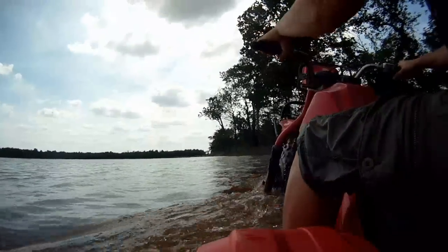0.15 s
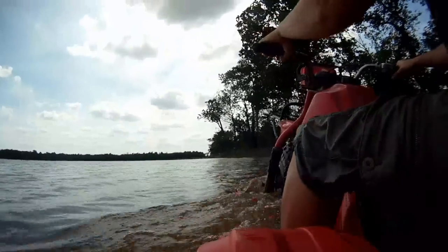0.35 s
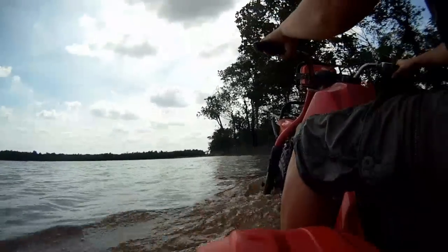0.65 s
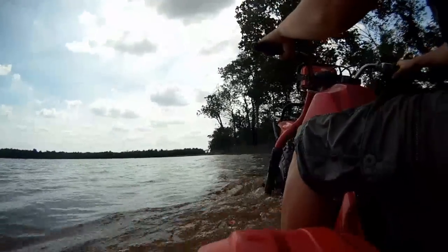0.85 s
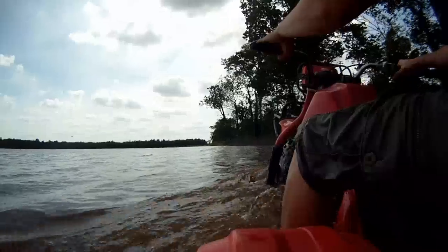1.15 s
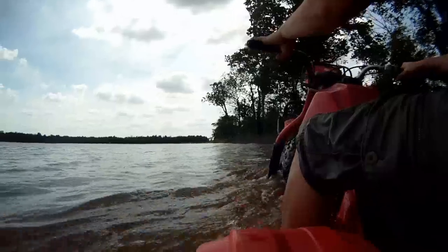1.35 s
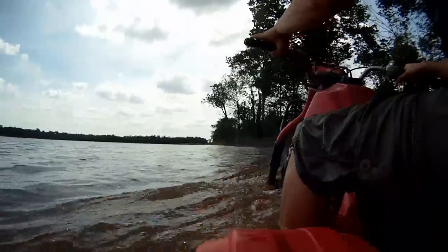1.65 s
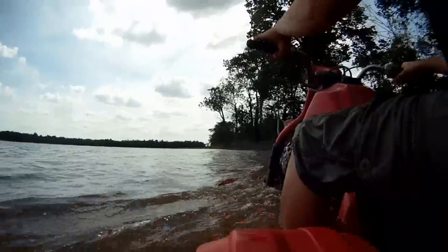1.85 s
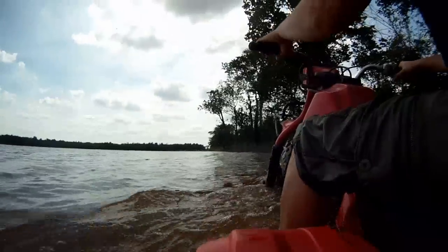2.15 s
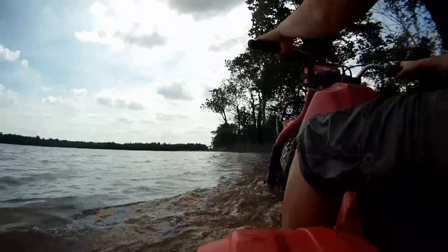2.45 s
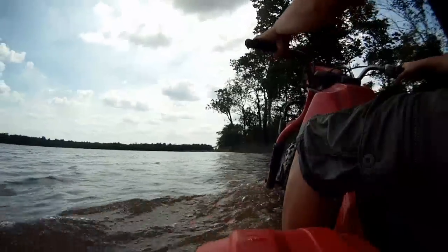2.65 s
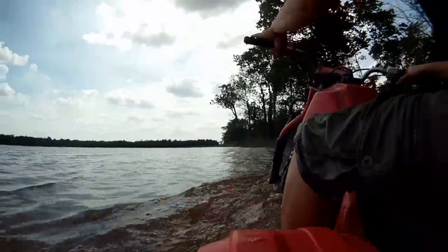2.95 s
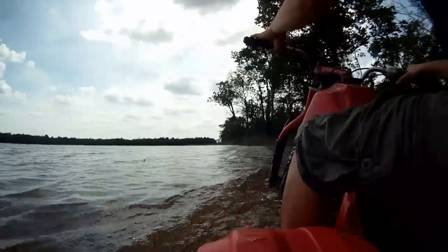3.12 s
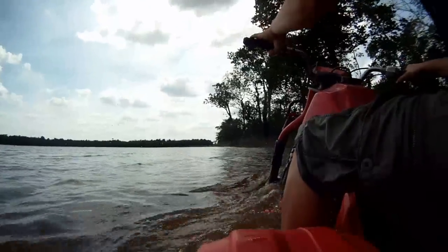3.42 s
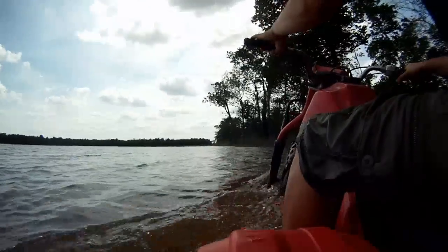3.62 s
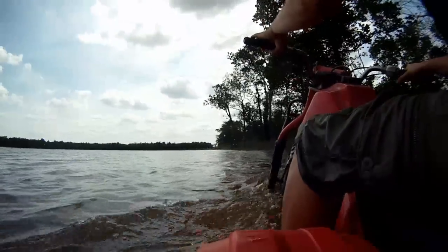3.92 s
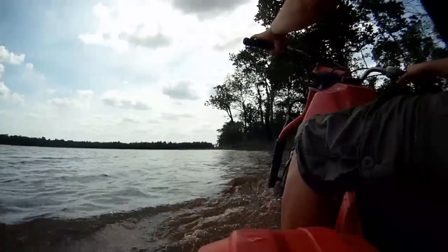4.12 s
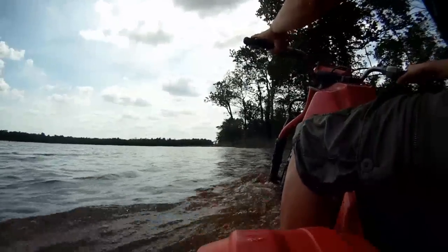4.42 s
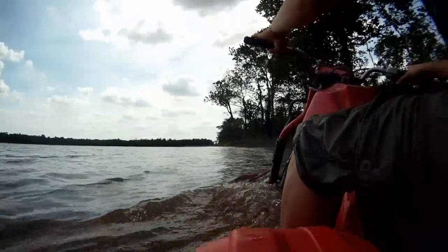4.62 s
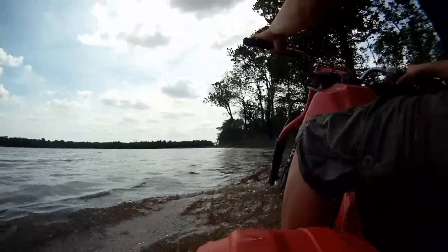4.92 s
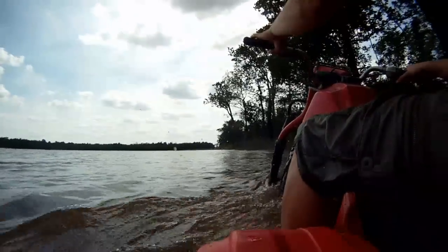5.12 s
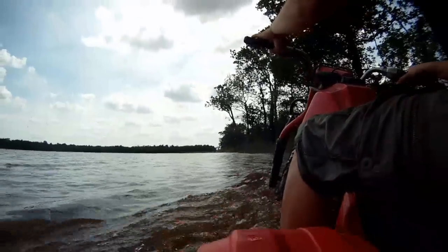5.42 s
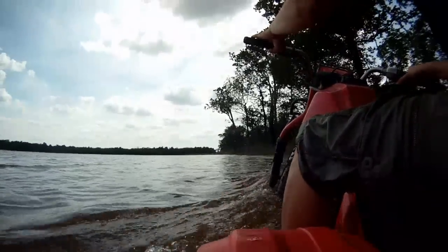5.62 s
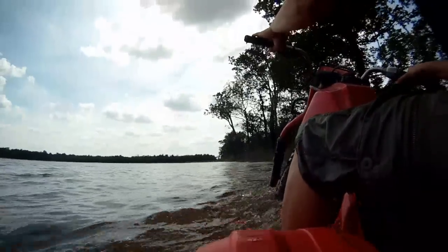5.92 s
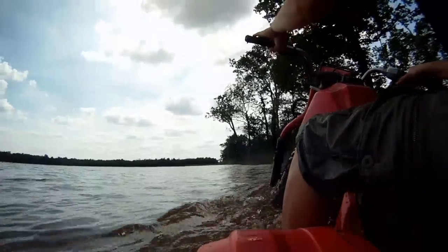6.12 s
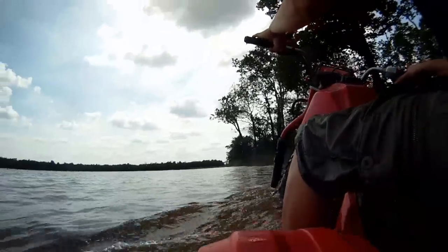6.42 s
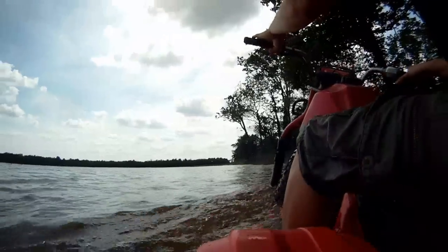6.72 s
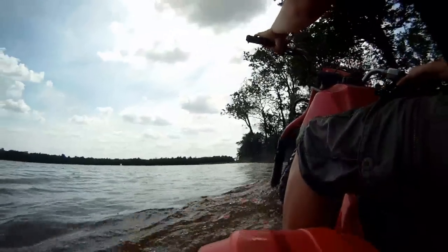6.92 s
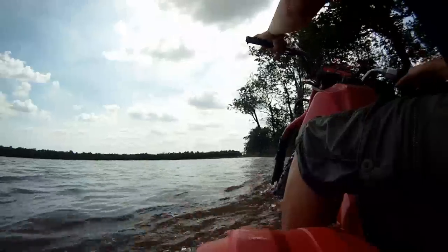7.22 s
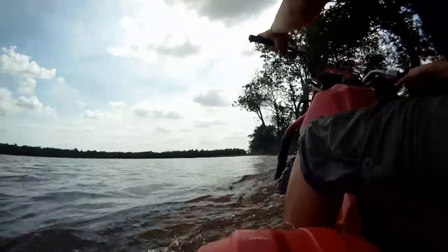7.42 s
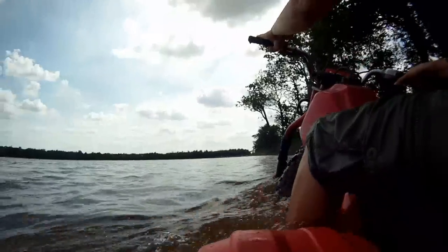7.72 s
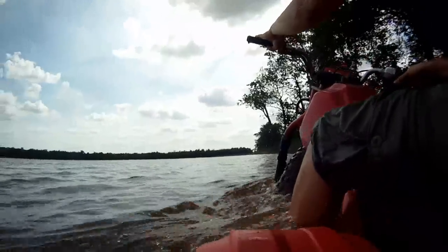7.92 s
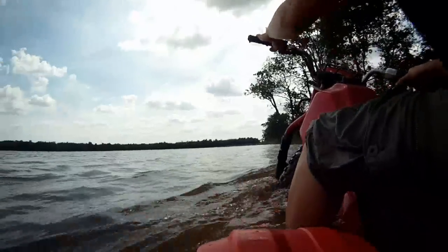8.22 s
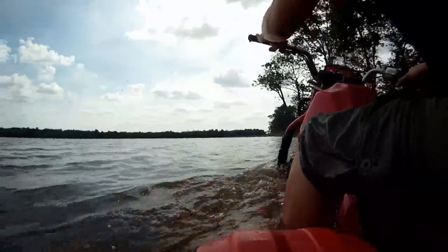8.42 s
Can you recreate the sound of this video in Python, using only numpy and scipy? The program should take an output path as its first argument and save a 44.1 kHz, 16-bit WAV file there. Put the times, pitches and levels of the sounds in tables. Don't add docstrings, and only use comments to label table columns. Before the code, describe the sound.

Close and boxy, a low motor throb runs throughout, pitch dipping slightly in jolts and sagging near the end. A nasal case rattle and thin gear singing swell as the engine pulls harder. Water rumbles and washes against the casing, with dull knocks around the middle and later, then a cluster of light drips. Outdoors on a lake, microphone sealed on the vehicle's frame.

```python
import sys
import numpy as np
from scipy import signal
from scipy.fft import rfft, irfft, next_fast_len
from scipy.io import wavfile
from scipy.ndimage import uniform_filter1d

SR = 44100
rng = np.random.default_rng(int(sys.argv[2]) if len(sys.argv) > 2 else 0)


def to_wav(sig):
    pcm = np.clip(np.atleast_2d(sig), -1, 1) * 32767
    pcm = np.round(pcm).astype(np.int16)
    wavfile.write(sys.argv[1], SR, pcm.T)


def rack_gain(trim_db):
    fader = np.asarray(trim_db, float)
    return 10 ** (fader / 20)


N = 377496

# [t/s, cycle rate f/Hz]
SPEED = [(0, 27.97), (.37, 29.06), (.6, 27.13), (1.98, 30.53), (2.45, 27.62), (2.72, 26.98), (3.09, 29.9),
         (3.37, 28.03), (3.62, 28.73), (5, 28.76), (5.5, 28.39), (5.8, 28.9), (6.27, 28.04), (6.52, 28.25),
         (7.3, 25.58), (7.65, 27.56), (8.36, 23.8), (8.56, 26.17)]
# [t/s, level/dB]
LOAD = [(0, 1), (.4, -3), (1.2, 0), (2.3, -1.5), (2.9, 0.5), (3.25, 9), (3.6, 2), (4.3, 7.5), (4.9, 1),
        (5.3, 5.5), (5.6, 0.5), (6.3, -1), (6.8, -1.5), (7.2, 4.5), (7.6, -3.5), (8, 2.5), (8.3, -0.5),
        (8.56, 2)]
# [multiple of the cycle, level/dB]
STEADY_ORDERS = [(3, -27.5), (6, -40.5), (7, -45), (9, -45), (10, -47), (11, -51), (13, -52)]
MOVING_ORDERS = (2, 4, 5, 8)
# [level/dB, share of load, resonance f/Hz, width/Hz, lift/dB, wander/dB,
# loss in a jolt/dB]
ORDER_MOTION = [
    (-21.5, 0.22, 55., 4., 1.6, 0.1, -2.5),
    (-23, -0.0024, 119.4, 5.3, 2.5, 0.76, 12.5),
    (-33., -0.57, 119.3, 9.7, 13.5, 2., -3.),
    (-43., 0.18, 229., 17.2, 13.5, 0.17, 3.5),
]
# [f/Hz, width/Hz, lift/dB]
MOUNT = (100, 3.7, 5.5)
# [t/s, depth/0-1, length/s]
JOLTS = [(.19, 0.35, 0.058), (.52, 1, 0.12), (2.74, .7, 0.18), (3.28, 0.5, 0.27), (3.89, 0.15, .08),
         (4.05, 0.81, 0.056), (4.22, 0.5, 0.12), (5.48, 0.1, .1), (5.7, 0.4, 0.16), (6.31, 0.78, 0.11),
         (6.9, 0.52, 0.61), (7.32, 0.77, 0.11), (7.84, 0, 0.067), (8.46, 1, 0.2)]
# [multiple of the cycle, level/dB, share of load]
GEAR_LINES = [(23.35, -43.5, .3), (27, -50, .7), (31.2, -40.5, .4), (32.2, -46, .2), (41, -53, .6),
              (42, -46.5, .9), (43, -54, .6), (46, -56, .3), (47, -55, .5), (48, -58, .2)]
# [t/s, level/dB, length/s]
SURGES = [(0, -3.5, .06), (.26, 5.5, 0.19), (.57, 5.5, 0.067), (.93, 3, 0.19), (1.33, 2.5, 0.06),
          (1.65, 4.5, .3), (2.07, 4.5, 0.083), (2.74, 7.5, 0.083), (3.1, 1.5, 0.084), (3.33, 5, 0.1),
          (3.5, 5, 0.085), (3.77, 5, 0.13), (4.05, 0.5, 0.59), (4.85, 2, 0.13), (5.03, 1.5, 0.033),
          (5.42, 5, 0.25), (5.72, 3.5, 0.13), (5.97, -0.5, 0.04), (6.17, -2.5, 0.041), (6.9, 2.5, 0.36),
          (7.2, -1.5, 0.1), (7.72, 2.5, .3), (8.44, 0.5, 0.37), (8.56, 4, 0.18)]
# [level/dB, share of load, share of surge, wander/dB]
BUZZES = [
    (-34, 0.26, 0.81, 1.03),
    (-43.5, 0.42, 0.34, 1.98),
    (-55.5, .05, 0.18, 0),
]
# [f/Hz, density level/dB]
LOW_CASE = [(300, -22), (450, -19.5), (526, -21.5), (588, -0.5), (683, -4.5), (733, -7.5), (860, 1.5),
            (940, 0), (1120, -14), (1230, -20), (1370, -16), (1500, -24), (1800, -24.5), (2300, -46.5)]
# [f/Hz, density level/dB]
HIGH_CASE = [(880, -44), (1500, -21.5), (1640, -8.5), (1790, -22.5), (1900, 0), (2080, 3), (2380, -11),
             (2570, -14.5), (2630, -29), (3000, -25), (3900, -54), (6600, -120)]
# [f/Hz, density level/dB]
SPRAY = [(1590, -37.5), (2700, -5), (3180, -10.5), (3670, 4.5), (4120, -4), (4620, -1), (5330, -9),
         (5600, -33.5), (5840, -38), (5900, -32.5), (7670, -50.5), (13000, -120)]
# [f/Hz, density level/dB]
SLOSH = [(12, -26), (20, -13), (53, -25.5), (114, 8), (137, -12), (176, -5.5), (228, -9.5), (325, -18.5),
         (485, -25.5), (600, -37), (780, -61), (1320, -120)]
# [t/s, peak level/dB, ring f/Hz]
DROPS = [(0.656, -49, 3700), (0.6933, -42.5, 3780), (1.0157, -47.5, 3880), (2.819, -40.5, 3800),
         (2.89, -38, 4620), (3.3353, -41, 4690), (6.602, -37, 3800), (7.489, -38, 3875),
         (7.5293, -26, 3390), (7.616, -41, 3880), (7.905, -48.5, 3700), (7.9438, -45, 3450),
         (8.0603, -39.5, 3580), (8.139, -39.5, 2500), (8.1793, -41.5, 3660), (8.2232, -45.5, 3680),
         (8.299, -33.5, 3660)]
# [t/s, peak level/dB, ring f/Hz]
LAST_DROP = [(8.552, -32, 3670)]
# [t/s, peak level/dB, ring f/Hz]
ACCENTS = [
    (1.218, -45, 872),
    (1.321, -29.5, 910),
    (2.477, -25, 880),
    (2.779, -16, 630),
    (3.339, -26.5, 890),
    (4.269, -14, 623.7),
    (5.03, -13, 875),
    (6.672, -14, 875),
    (7.184, -12.5, 821.7),
]
# [f/Hz, level/dB]
BALANCE = [(200, 0), (370, -.3), (680, -.5), (1240, -1.1), (2280, -1.3), (4180, -.5)]
# [f/Hz, density level/dB]
GRIT = [(15, -23), (25, 9), (80, 0.5), (150, 2.5), (531, -7.5), (895, -8), (1120, -9), (2070, -13),
        (4570, -19.5), (5600, -18.5), (7280, -64), (12300, -120)]
# [lower edge f/Hz, share of the sum, share of the difference]
LOST_DETAIL = [(0, 0, .6), (340, 0, .35), (2600, .35, .5), (3400, .12, .55), (4100, .3, .65),
               (4700, .62, .8), (5400, .93, .95), (5700, .98, .98), (6600, .88, .92), (6900, .68, .85),
               (8600, .84, .93), (9500, .25, .85), (12000, .33, .88), (13500, .45, .9), (15000, 0, 0)]

WANDER_HZ = 4.7
HOLD_HZ = 12000


def evened(x):
    return x / np.sqrt(np.mean(x ** 2) + 1e-20)


def read(points, hz):
    f, value = np.transpose(points)
    return np.interp(np.log(hz + 1), np.log(f + 1), value)


def columns(rows):
    s, *values = np.transpose(rows)
    return [np.interp(np.arange(N) / SR, s, v) for v in values]


def filtered(x, gain):
    size = next_fast_len(N)
    return irfft(rfft(x, size) * gain(np.fft.rfftfreq(size, 1 / SR)), size)[..., :N]


def coloured(x, points):
    def gain(hz):
        inside = (hz > points[0][0]) & (hz < points[-1][0])
        return rack_gain(read(points, hz)) * inside
    return evened(filtered(x, gain))


def drift(hz, size=64):
    count = next_fast_len(N // size + 2)
    loss = 1 + (np.fft.rfftfreq(count, size / SR) / hz) ** 2
    slow = irfft(rfft(rng.standard_normal(count)) / loss, count)
    return np.interp(np.arange(N) / size, np.arange(count), evened(slow))


def bumps(rows):
    t = np.arange(N) / SR
    return sum(size * np.exp(-(2 * (t - s) / length) ** 2) for s, size, length in rows)


def gate(turns, place, sharp):
    return np.exp(sharp * (np.cos(2 * np.pi * (turns - place)) - 1))


def resonance(hz, peak_hz, width_hz):
    return 1 / (1 + ((hz - peak_hz) / width_hz) ** 2)


def speed():
    t = np.arange(N) / SR
    flywheel_s = 0.12
    hz = uniform_filter1d(columns(SPEED)[0], round(flywheel_s * SR), mode="nearest")
    tug_hz, tug_swing_hz, tug_top_s = 2.75, .1, 4.2
    return hz + tug_swing_hz * np.cos(2 * np.pi * tug_hz * (t - tug_top_s))


def moving_levels(hz, load_db):
    jolt = bumps(JOLTS)
    levels_db = []
    for k, motion in zip(MOVING_ORDERS, ORDER_MOTION):
        db, share, peak_hz, width_hz, lift_db, wander_db, loss_db = motion
        swell_db = lift_db * resonance(k * hz, peak_hz, width_hz)
        chance_db = wander_db * drift(WANDER_HZ)
        levels_db.append(db + share * load_db + swell_db + chance_db - loss_db * jolt)
    return levels_db


def thump(hz, turns, load_db):
    mount_hz, mount_width_hz, mount_db = MOUNT
    orders = [(1, -30.5 - 1.1 * load_db + 2.5 * drift(10))]
    orders += list(zip(MOVING_ORDERS, moving_levels(hz, load_db)))
    orders += [(k, db + mount_db * resonance(k * hz, mount_hz, mount_width_hz)) for k, db in STEADY_ORDERS]
    waver, waver_hz = .075, 9
    out = np.zeros(N)
    for k, db in orders:
        lead = 1.05 + .05 * load_db if 2 < k < 6 else .3 * (k != 2)
        size = 1 + waver * np.sqrt(k) * drift(waver_hz)
        slip = waver * k * 0.61 * drift(waver_hz)
        out -= np.sqrt(2) * rack_gain(db) * size * np.cos(2 * np.pi * k * turns + lead + slip)
    return out


def whine(hz, turns, load_db):
    slack = turns + .002 * drift(4)
    too_fast_db = 9 / (1 + np.exp((29.05 - hz) / .12))
    too_slow_db = 5 / (1 + np.exp((hz - 25.4) / .2))
    drive_db = load_db + 4 * resonance(hz, 28.6, .8) - 3 - too_fast_db - too_slow_db
    out = np.zeros(N)
    for k, db, share in GEAR_LINES:
        level_db = db + share * drive_db + 3 * drift(12)
        out += rack_gain(level_db) * np.cos(2 * np.pi * (k * slack + rng.random()))
    return np.sqrt(2) * out


def rattle(per_s, spread_db, hiss):
    knocks = rack_gain(spread_db * np.minimum(rng.exponential(1, N), 4)) * (rng.random(N) < per_s / SR)
    return evened(knocks * rng.choice([-1, 1], N)) + hiss * rng.standard_normal(N)


def buzz(turns, load_db):
    surge_db = bumps(SURGES)
    low_db, high_db, spray_db = [
        db + pull * load_db + wave * surge_db + wander_db * drift(WANDER_HZ)
        for db, pull, wave, wander_db in BUZZES]
    gust_db = drift(32)

    shake = 1 + 0.046 * np.cos(2 * np.pi * 8 * turns)
    low_shake = shake * (1 + 0.12 * gate(2 * turns, 0.79, 1.5))
    low = coloured(rattle(1500, 2.8, 0.9) * low_shake, LOW_CASE)

    high_shake = 0.73 + 0.26 * gate(turns, .02, 1.1) + 0.33 * gate(turns, 0.62, 2.8)
    high = coloured(rattle(1200, 1.56, 0.82) * high_shake, HIGH_CASE)

    valve = gate(turns, .94, 25) * rack_gain(2.3 * drift(26)) + 0.22 * gate(turns, 0.33, 43)
    spray = coloured(rattle(900, 4., 0.75) * (0.98 + 0.4 * valve), SPRAY)

    mix = rack_gain(low_db + 1.38 * gust_db) * low
    mix += rack_gain(high_db + 1.32 + 0.68 * gust_db) * high
    return mix + rack_gain(spray_db + 0.72 * gust_db) * spray


def slosh(load_db):
    level_db = -31 + 0.51 * load_db + 2.9 * drift(17)
    return rack_gain(level_db) * coloured(rng.standard_normal(N), SLOSH)


def knocks(rows, t60, crack, low_hz, high_hz):
    size = 2000
    out, t = np.zeros(N + size), np.arange(size) / SR
    for s, db, hz in rows:
        at = round(s * SR)
        strike = 0.92 * np.sin(2 * np.pi * hz * t) + crack * rng.standard_normal(size)
        out[at:at + size] += rack_gain(db - 60 * t / t60) * strike

    def band(hz):
        return 1 / (1 + (low_hz / (hz + 1)) ** 4) / (1 + (hz / high_hz) ** 4)
    return filtered(out[:N], band)


def scene():
    hz = speed()
    load_db = columns(LOAD)[0]
    turns = np.cumsum(hz) / SR + .3
    case = thump(hz, turns, load_db) + whine(hz, turns, load_db) + buzz(turns, load_db)
    case += slosh(load_db)
    case += knocks(list(DROPS) + list(LAST_DROP), t60=.014, crack=2.5, low_hz=950, high_hz=5000)
    case += knocks(ACCENTS, t60=0.026, crack=0.2, low_hz=553, high_hz=2200)
    return np.array([filtered(case, lambda f: rack_gain(side * read(BALANCE, f) / 2)) for side in (1, -1)])


def thinned(x, size=2048):
    window = np.sqrt(signal.windows.hann(size, sym=False))
    hz, _, z = signal.stft([x[0] + x[1], x[0] - x[1]], SR, window, size, size // 2)
    chance = rng.standard_normal(z.shape)
    treble = (hz > 9400)[:, None]

    apart_now = chance[1, 0] > .75
    apart_band = treble + .17 * (hz < 250)[:, None]
    z[1] += rack_gain(-13) * z[0] * chance[0] * apart_now * apart_band

    frame_db = np.array([[[4]], [[4]]]) + np.array([[[0]], [[22]]]) * treble
    patch = uniform_filter1d(uniform_filter1d(chance, size=7, axis=1), size=2)
    budget_db = frame_db * chance[:, :1] + 20 * patch
    strength = uniform_filter1d(abs(z) ** 2, size=5, axis=1) * rack_gain(budget_db)
    for (lo, *shares), (hi, *_) in zip(LOST_DETAIL, LOST_DETAIL[1:]):
        band = (hz >= lo) & (hz < hi)
        for part, power, share in zip(z, strength, shares):
            part[band] *= power[band] >= np.quantile(power[band], share)
    total, apart = signal.istft(z, SR, window, size, size // 2)[1][:, :N]
    return np.array([total + apart, total - apart]) / 2


def band_limit(x):
    return signal.sosfilt(signal.butter(12, 14640, fs=SR, output="sos"), x)


def record(dry):
    grit = [rack_gain(-47 + 0.79 * drift(17)) * coloured(rng.standard_normal(N), GRIT) for _ in dry]
    low = filtered(dry + grit, lambda hz: np.clip((HOLD_HZ / 2 - hz) / 700, 0, 1))
    carrier = 2 * np.cos(2 * np.pi * HOLD_HZ * np.arange(N) / SR)
    image = filtered(low * carrier, lambda hz: hz < 14500)

    def droop(hz):
        source_hz = np.clip(abs(hz - HOLD_HZ), 0, HOLD_HZ / 2)
        return np.sinc(hz / HOLD_HZ) / np.sinc(source_hz / HOLD_HZ)
    mix = thinned(low + filtered(image, droop))
    return band_limit(mix)


dry = scene()
out = record(dry)
to_wav(out)
```